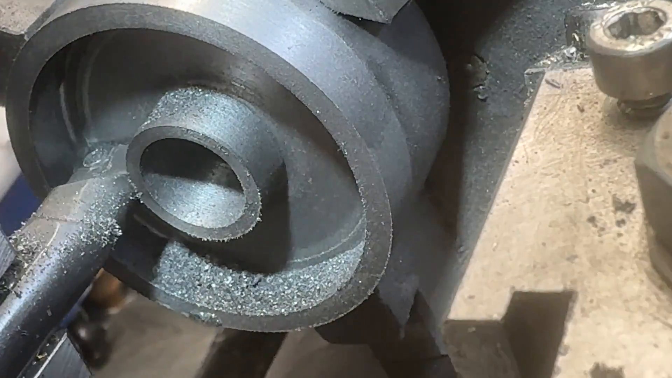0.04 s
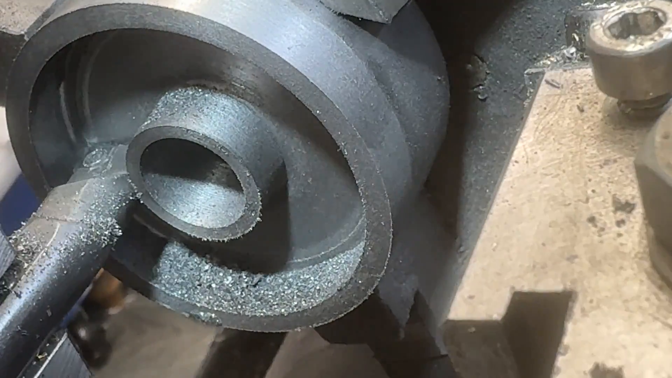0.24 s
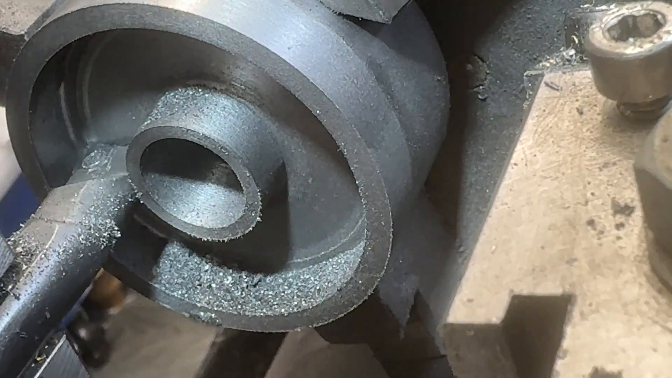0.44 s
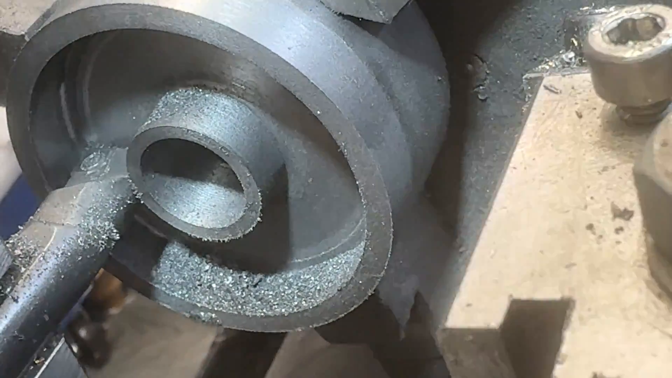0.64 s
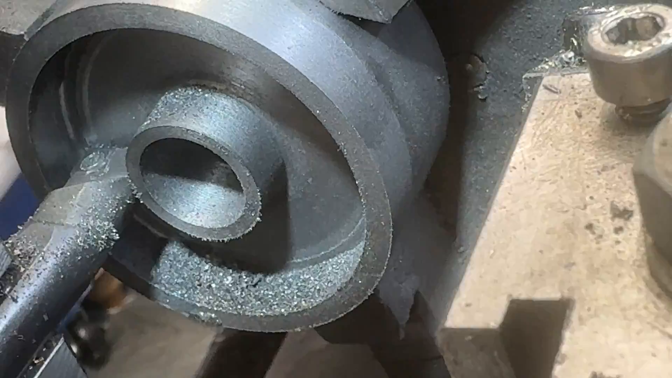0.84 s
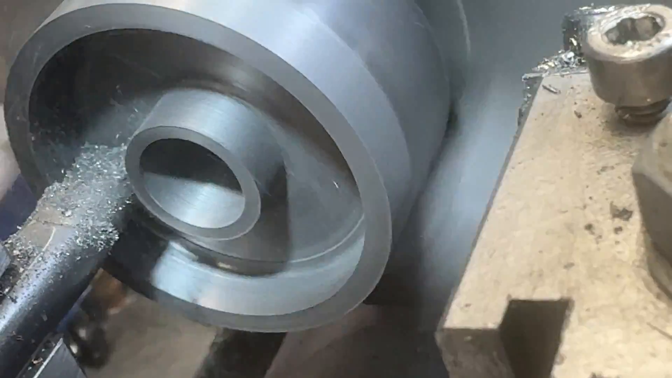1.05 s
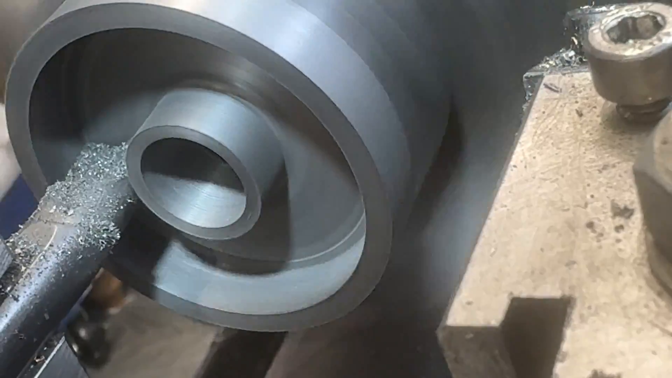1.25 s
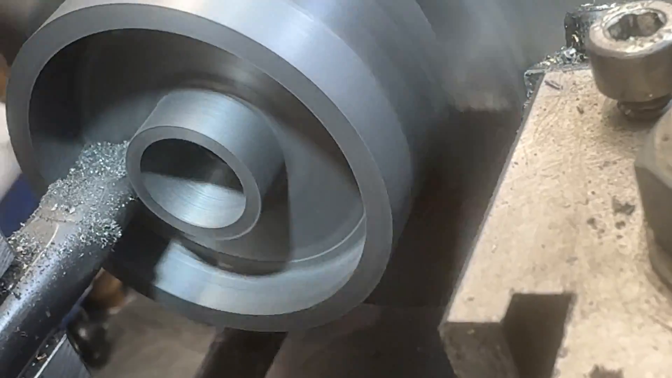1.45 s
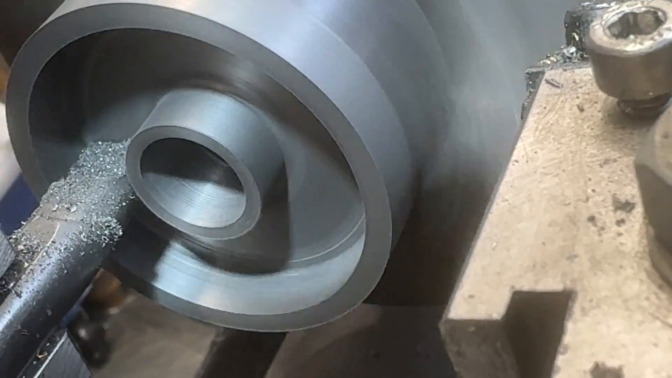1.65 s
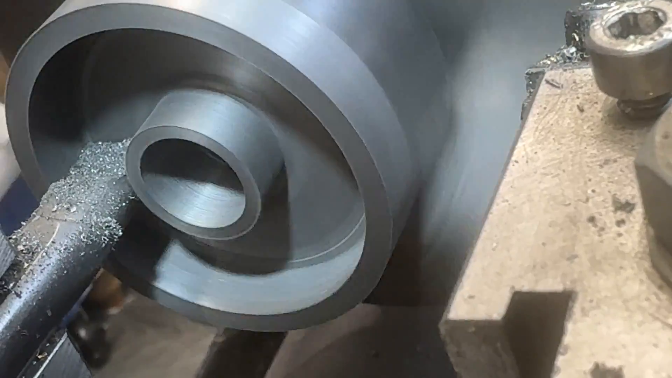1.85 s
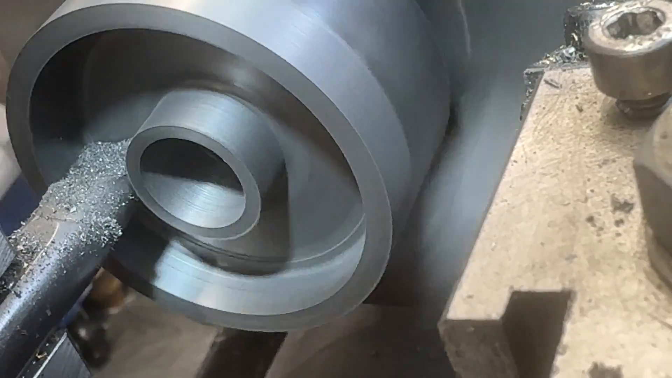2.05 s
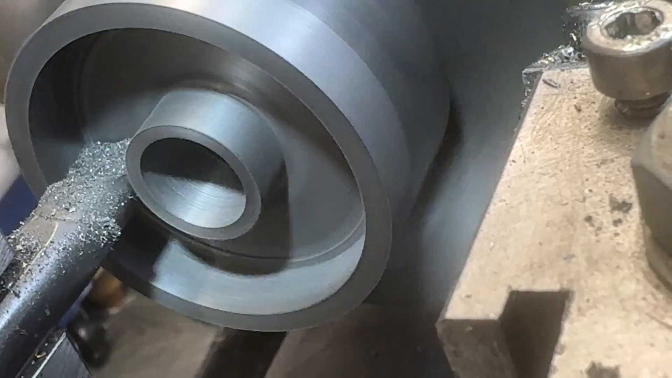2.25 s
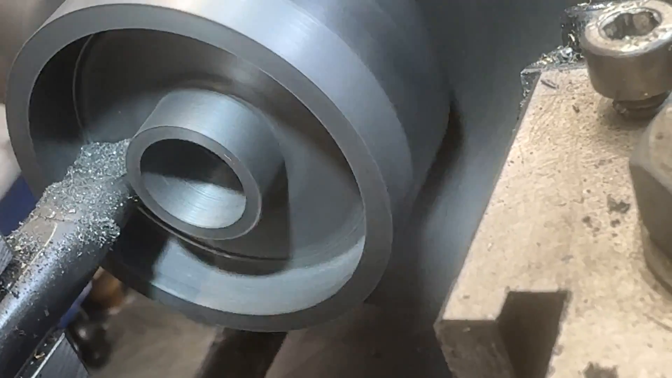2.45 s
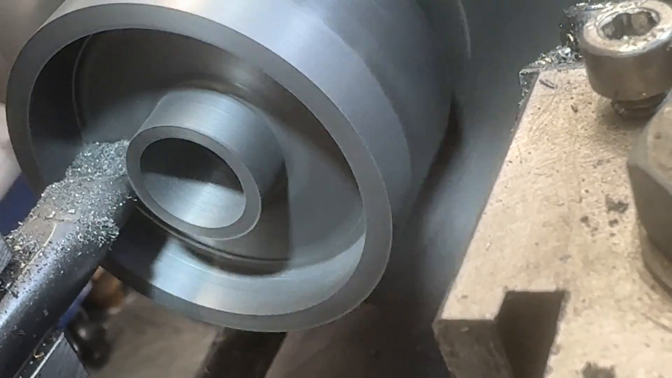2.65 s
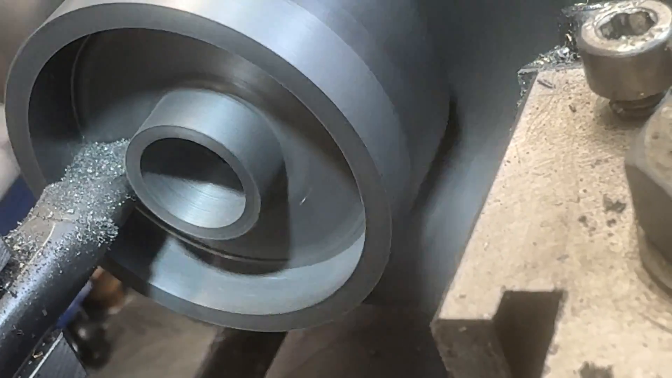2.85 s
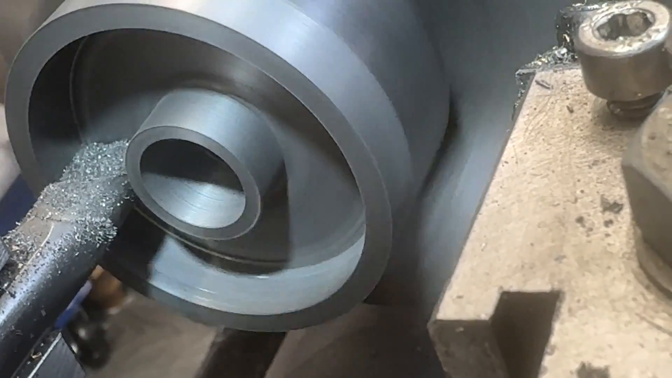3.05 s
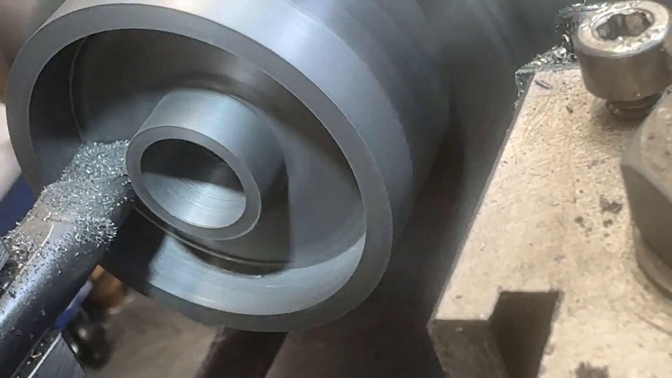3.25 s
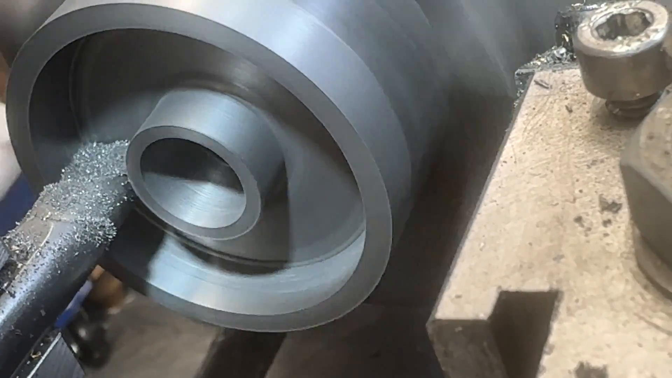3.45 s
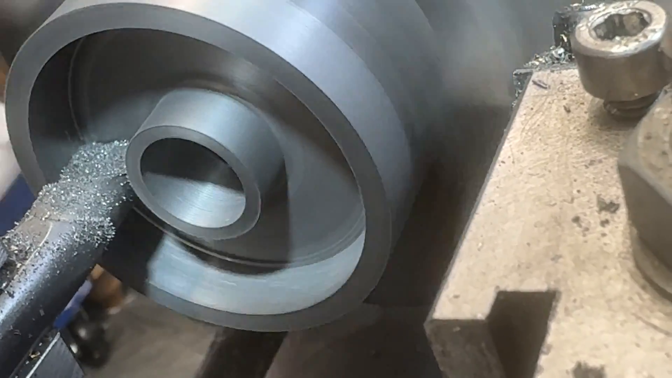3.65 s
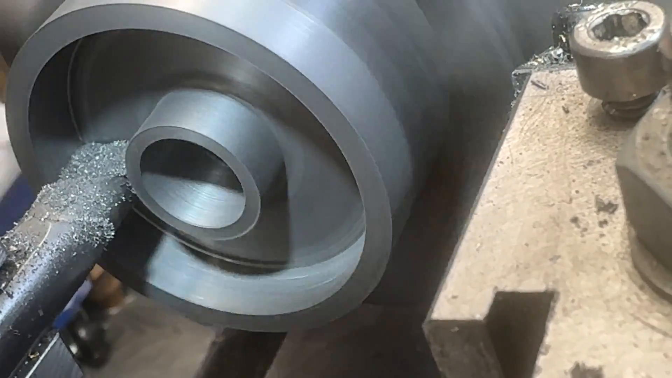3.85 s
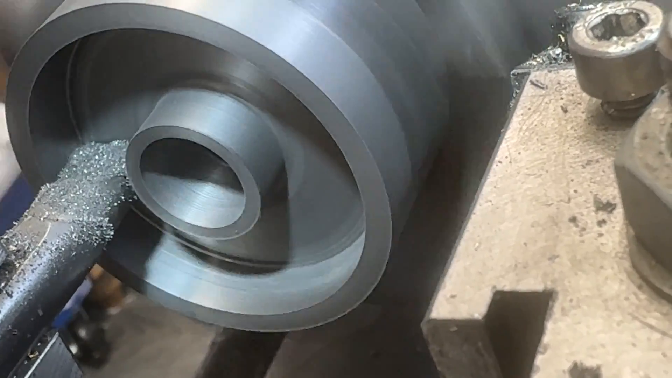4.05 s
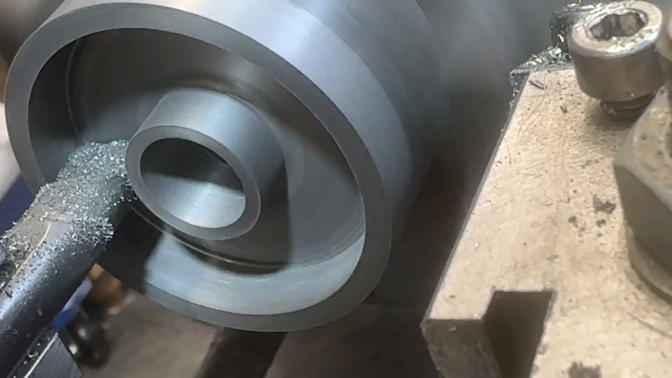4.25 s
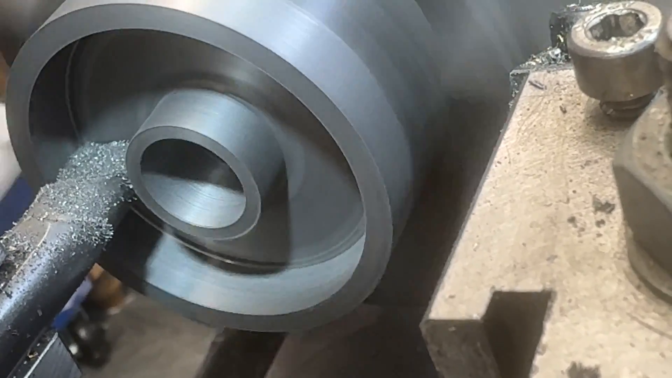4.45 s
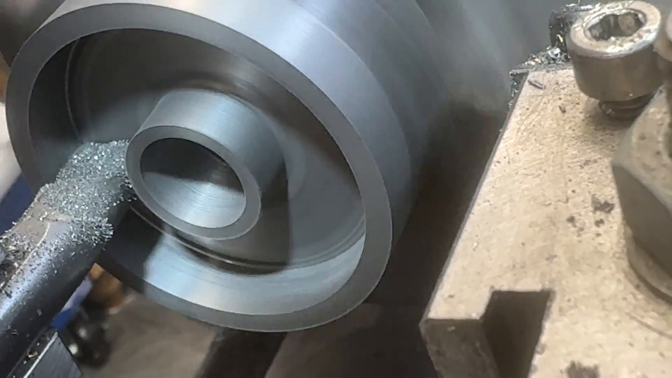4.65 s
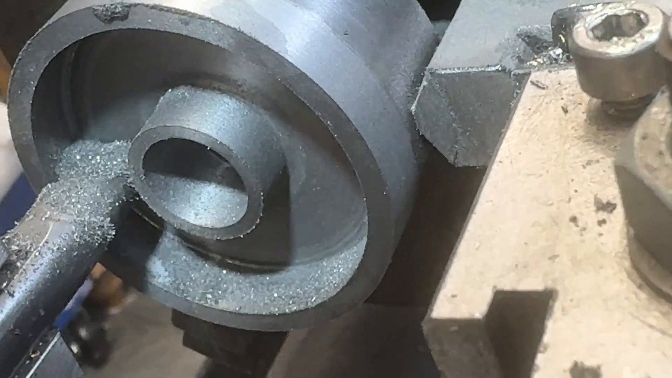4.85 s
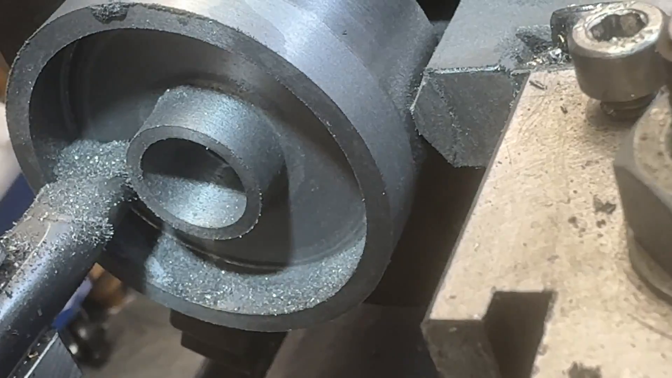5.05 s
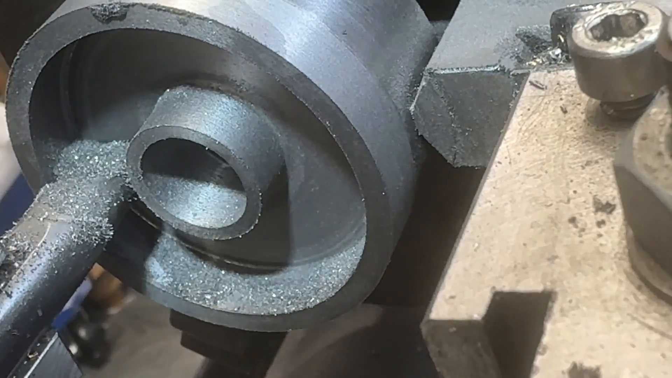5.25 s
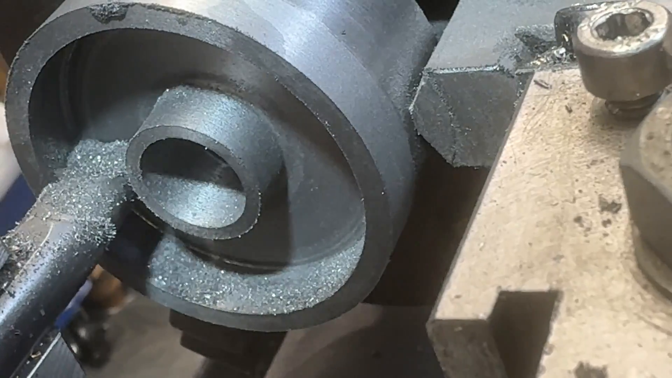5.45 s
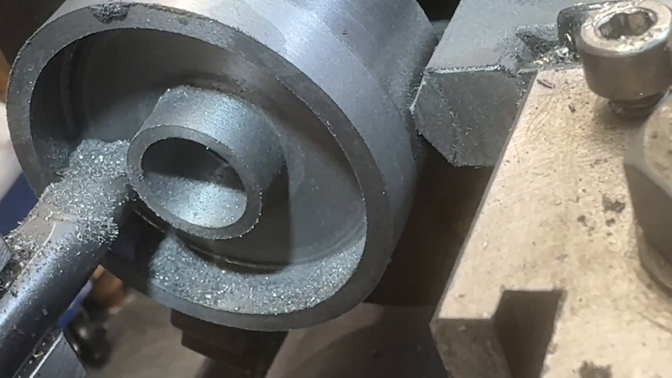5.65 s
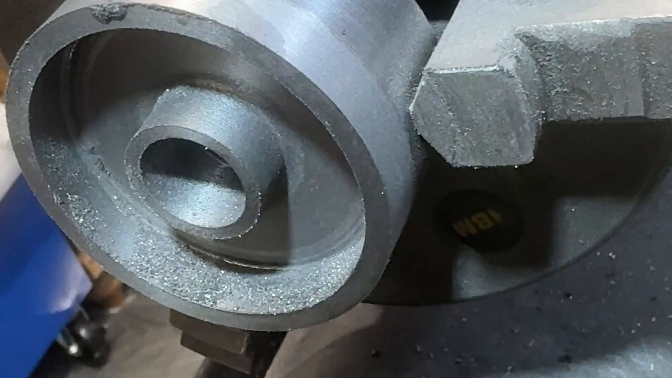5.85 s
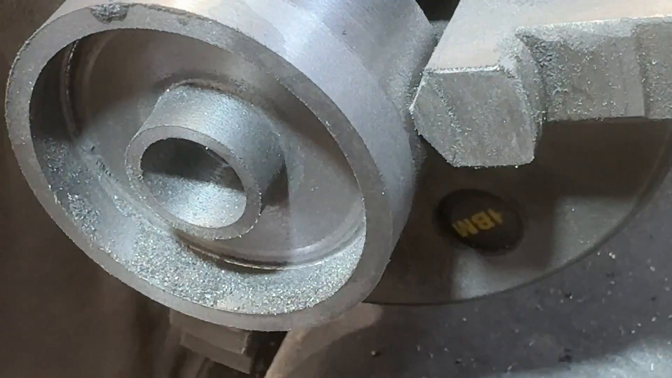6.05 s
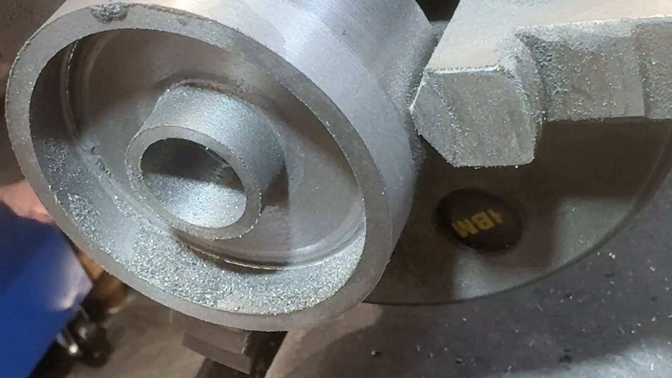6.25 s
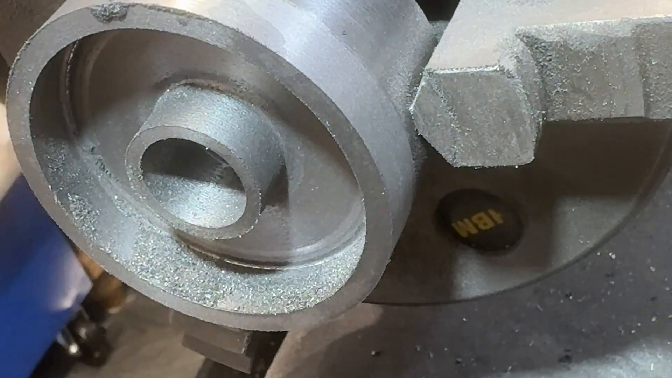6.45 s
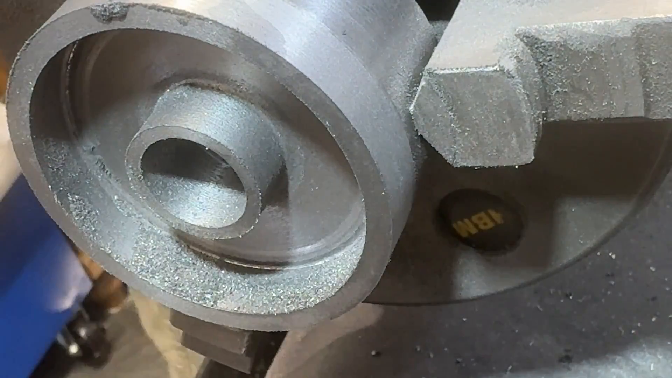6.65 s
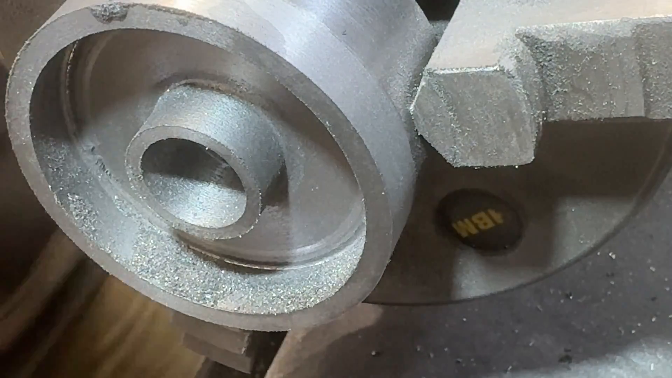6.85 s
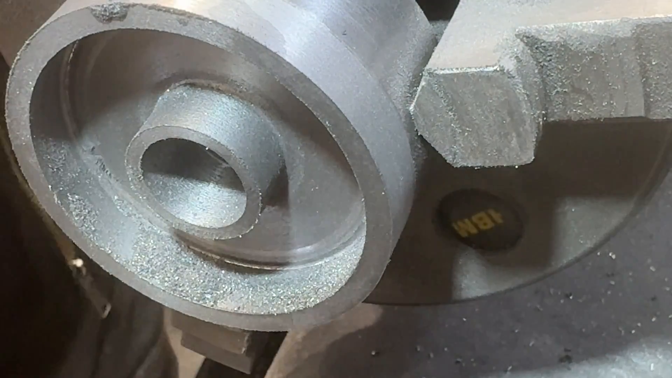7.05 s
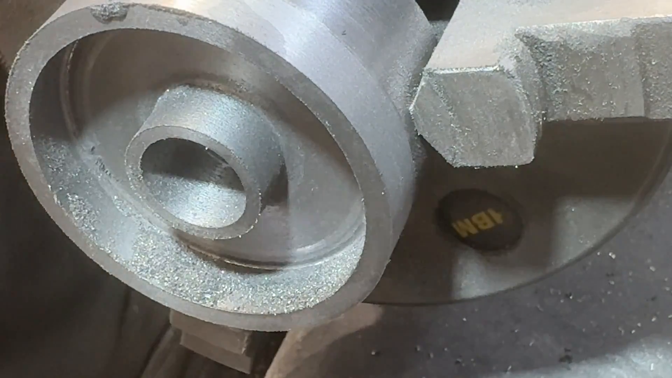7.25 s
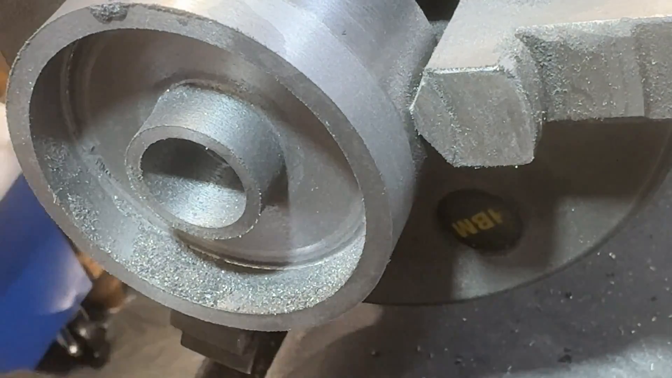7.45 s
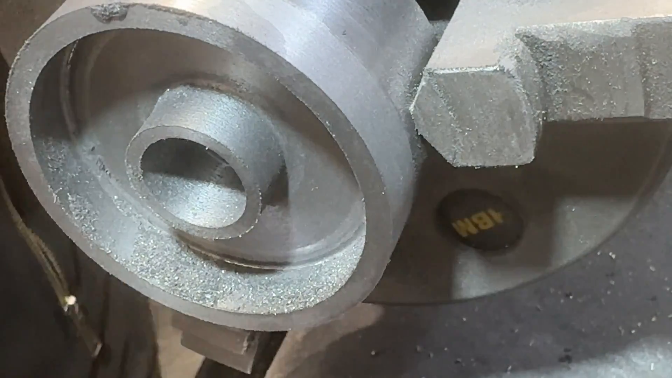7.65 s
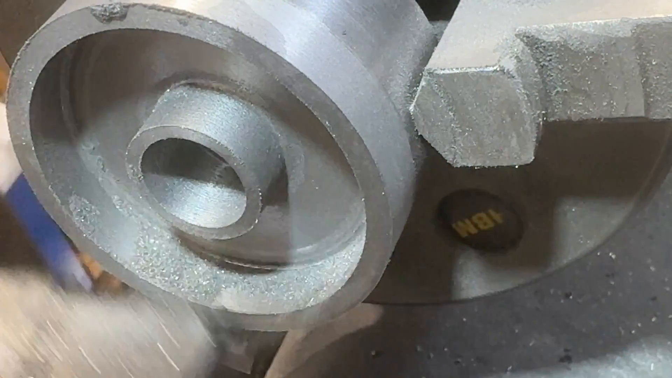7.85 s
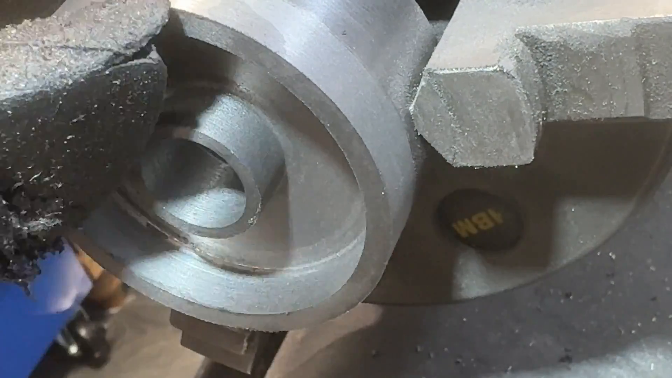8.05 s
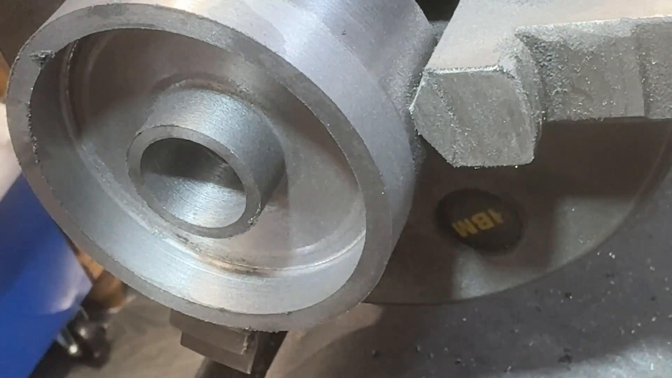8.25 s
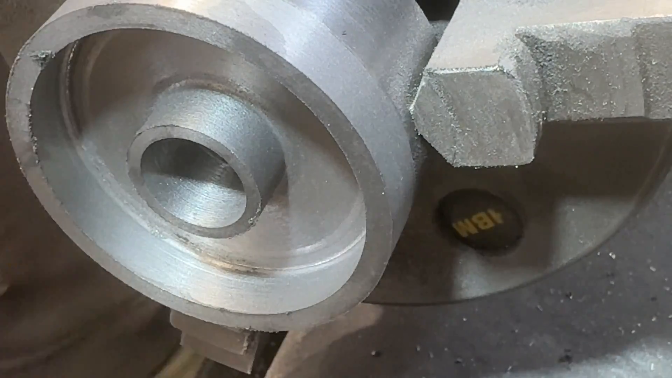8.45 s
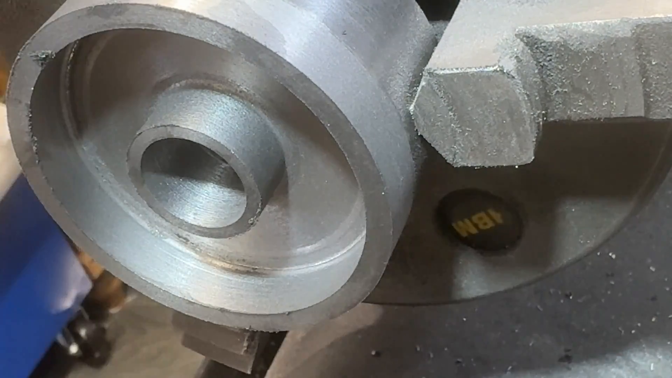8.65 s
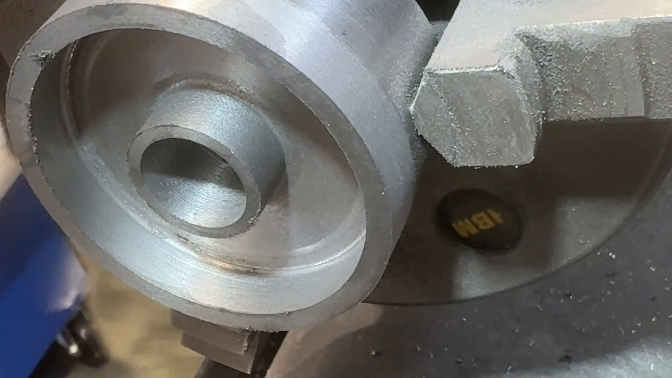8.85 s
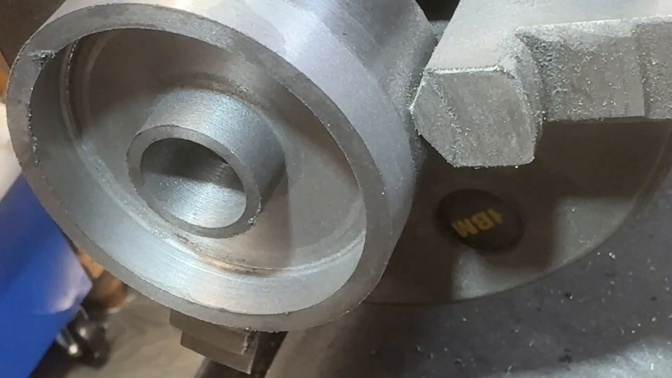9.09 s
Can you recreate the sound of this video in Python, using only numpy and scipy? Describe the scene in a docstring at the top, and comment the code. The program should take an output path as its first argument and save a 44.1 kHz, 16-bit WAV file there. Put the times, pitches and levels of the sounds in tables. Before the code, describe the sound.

Close to the microphone in a workshop, a metal lathe starts with light clicks and a rising whir. Brief scrapes lead into a steady, harsh cut that chatters and squeals. When the cut ends, the motor hums on under a short hollow rumble and some metallic knocks. Then a small vacuum cleaner starts with a high whine, sucks up metal chips with uneven rushing air and little taps, and winds down.

```python
"""A workshop, a small lathe close to a two-port microphone. After a few wipes and lever clicks the
drive motor runs up. The tool touches, then cuts a hollow metal part: the scrape repeats each turn and
rings the part and the boring bar. The spindle stops, the motor idles on, the carriage is wound back.
A hand vacuum cleaner whines up, sucks the chips out of the part and runs down."""
import sys
import numpy as np
from scipy import signal
from scipy.fft import rfft, irfft, next_fast_len
from scipy.io import wavfile
from scipy.ndimage import uniform_filter1d, map_coordinates

SR = 44100
rng = np.random.default_rng(int(sys.argv[2]) if len(sys.argv) > 2 else 0)


def digitize_waveform(pressure):
    """Quantize a signal to 16-bit integers and store it at the path in sys.argv[1].

    Rows of a 2-D input are taken as channels; values are limited to [-1, 1].
    """
    field = np.atleast_2d(pressure).T
    bounded = np.clip(field, -1, 1)
    quanta = np.round(bounded * 32767).astype(np.int16)
    wavfile.write(sys.argv[1], SR, quanta)


N = 402191
M = next_fast_len(N)
T, HZ = np.arange(N) / SR, np.fft.rfftfreq(M, 1 / SR)
CLUTCH_OUT_S = 4.86

# resonances of the part and of the boring bar: pitch_hz, width_hz, level_db
PART_MODES = [(2473, 105, -5.5), (4180, 190, -10), (5086, 193, 3.5), (5600, 260, -1), (6020, 60, -5.5),
              (7140, 120, -5), (7906, 220, 2), (8380, 27, 2), (9180, 140, -3.5), (9740, 500, 1.5),
              (11200, 140, -7)]
BAR_MODES = [(3464, 74, 0.5), (3608, 85, 2.5), (3790, 150, 8.5)]
# long cut: time_s, level_db, body_rel_db, bar_rel_db, chatter_rel_db
LONG_CUT = [(2.0, -45, -7, -1.5, -27), (2.012, -32.5, -24, -3, -3), (2.03, -32, -16, -2, -1),
            (2.25, -30, -15, 2, 1), (2.42, -32.5, -6.5, 1, -9), (2.57, -30.5, -7.5, 2.5, 5),
            (2.9, -31, -7.5, 0.5, -35), (3.05, -30, -8, 0.5, 0), (3.53, -34.5, -10.5, 2, -16),
            (3.68, -31.5, -8.5, -2, -5), (4.0, -30.5, -8.5, 1.5, 2.5), (4.1, -31.5, -5.5, 6.5, 5.5),
            (4.33, -34.5, -9.5, 6, 5.5), (4.48, -32.5, -5, 3, 2), (4.67, -34, -11, 2, -4),
            (4.79, -32.5, -5, -0.5, -14), (4.86, -50, 12, 7, -24), (4.92, -94, 3, -9, -10)]


def gain_of(db):
    """Decibels to gain."""
    return 10 ** (np.asarray(db) / 20)


def unit_rms(x):
    """Scale to rms 1."""
    return x / np.sqrt(np.mean(x ** 2) + 1e-20)


def steady(x):
    """Divide out the slow level."""
    return x / np.sqrt(uniform_filter1d(x ** 2, size=6000) + 1e-20)


def spectrum(points):
    """Interpolate over log frequency."""
    hz, value = np.transpose(points)
    return np.interp(np.log(HZ + 1), np.log(hz + 1), value)


def window(start_s, end_s, edge_s):
    """Gate with linear edges."""
    return np.clip(np.minimum(T - start_s, end_s - T) / edge_s, 0, 1)


def curves(rows):
    """Gate over the rows' span, then each column at sample rate."""
    time_s, *values = np.transpose(rows)
    return window(time_s[0], time_s[-1], 0.004), *(np.interp(T, time_s, v) for v in values)


def strokes(rows, edge_s):
    """Envelope of strokes: fade in, hold, fade out."""
    return sum(gain_of(db) * np.clip(np.minimum(T - s, s + length_s - T) / edge_s + .5, 0, 1) ** 2
               for s, length_s, db in rows)


def filtered(x, gain):
    """Apply a gain over frequency."""
    return irfft(rfft(x, M) * gain, M)[:N]


def noise(gain):
    """Coloured noise, rms 1."""
    return unit_rms(filtered(rng.standard_normal(M), gain))


def wander(rate_hz):
    """Smooth random drift, rms near 1."""
    coarse = rng.standard_normal(int(N / SR * rate_hz) + 4)
    return map_coordinates(coarse, [T * rate_hz], order=2)


def rings(modes, steep=1.57):
    """Gain over frequency of resonances: pitch_hz, width_hz, level_db."""
    return np.sqrt(sum(gain_of(db) ** 2 / (1 + (2 * (HZ - hz) / width_hz) ** 2) ** steep
                       for hz, width_hz, db in modes))


def tone(hz):
    """Sine on a pitch curve, rms 1."""
    return np.sqrt(2) * np.sin(2 * np.pi * (np.cumsum(hz) / SR + rng.random()))


def wipes(shop_db=-75):
    """Dry wiping strokes over the quiet shop, and a brief thin tone."""
    swipes = [(0, 0.042, -73), (.1, 0.081, -68), (.285, 0.064, -64), (.43, 0.065, -66), (.59, 0.079, -64),
              (.74, 0.11, -63.5)]  # start_s, length_s, level_db
    colour = [(100, -62), (220, -17.5), (497, -6), (917, -14.5), (1090, -12), (1840, -9), (2420, -25),
              (2870, -21.5), (15500, -33)]  # freq_hz, density_db
    level = np.hypot(strokes(swipes, edge_s=0.02), gain_of(shop_db))
    thin = gain_of(-77 + 2.3 * wander(31.7)) * tone(1106 + 2.6 * wander(18)) * window(.35, .62, .02)
    return level * noise(gain_of(spectrum(colour))) + thin


def knocks(strike_t60_s=0.000091, rattle_t60_s=0.071, tick_t60_s=0.03):
    """A sharp strike and a short rattle ring the lever; a treble tick on top."""
    hits = [(0.015, -53, -87, -5), (0.066, -50, -80, -2.5), (0.545, -68, -83, -2), (0.619, -47, -76, -1.5),
            (0.735, -52, -66, 9.5), (0.751, -48, -55, -5), (0.788, -55, -60, 1), (0.855, -49, -56, -5),
            (0.87, -47, -52, -4), (0.895, -42, -62, -9), (1.037, -36.5, -41, -6), (1.38, -36, -40, -4.5),
            (1.423, -40, -55, -6), (4.995, -43, -50, 0), (5.725, -37.5, -58, -2), (5.774, -50, -65, -4),
            (5.797, -44, -65, -2), (5.845, -41, -65, -10), (5.919, -41, -65, -2), (6.091, -43.5, -45, -3),
            (6.3, -48, -53, -5), (6.3947, -28.5, -40.5, -14), (6.478, -45, -51, -8)]  # start_s, level_db, tick_db, rattle_rel_db
    lever_modes = [(910, 260, 6), (1160, 72, 12), (1565, 170, 14), (2010, 120, 5), (2540, 170, 1),
                   (3070, 140, -11), (4400, 550, -30)]  # pitch_hz, width_hz, level_db
    t = np.arange(4000) / SR
    blows, ticks = np.zeros((2, N + len(t)))
    strike = 5.2 * gain_of(-60 * t / strike_t60_s)
    for start_s, db, tick_db, rattle_db in hits:
        rattle, tick = rng.standard_normal((2, len(t)))
        rattle *= gain_of(rattle_db - 60 * t / rattle_t60_s) * np.minimum(t / 0.001, 1)
        blows[round(start_s * SR):][:len(t)] += gain_of(db) * (strike + rattle)
        ticks[round(start_s * SR):][:len(t)] += gain_of(tick_db - 60 * t / tick_t60_s) * tick
    ring = sum(gain_of(db) * width_hz * np.exp(-np.pi * width_hz * t) * np.sin(2 * np.pi * hz * t)
               for hz, width_hz, db in lever_modes)
    ring = signal.sosfilt(signal.butter(4, 750, "high", fs=SR, output="sos"), ring)
    lever = signal.oaconvolve(blows, ring / np.linalg.norm(ring))[:N]
    tick_colour = rings([(4180, 900, 6), (6150, 2700, 8.7), (11000, 9500, 2.5)])
    return lever + filtered(ticks, tick_colour / (1 + (2500 / (HZ + 1)) ** 2))


def motor():
    """Shaft orders and switching whistles waver over a roar; a loose cover rings at idle."""
    levels = [(.77, -38, 0), (.8, -11.5, 3), (.9, 1, -3), (1.05, 0.5, -1), (2, 2.5, 2), (4.8, -1, 4),
              (4.9, -1.5, -6), (5.5, 0.5, -3), (6.6, 2.5, 5.5), (6.8, 0, -1), (8.7, -6.5, -7),
              (9.12, -2, -1)]  # time_s, gain_db, whistle_rel_db
    loaded_tones = [(635.2, -64), (800, -61), (838, -55), (950, -66), (1163, -66), (1470, -63), (2509, -62),
                    (3472, -64), (3628, -66), (5050, -68), (6492, -64), (7257, -61), (7413, -67),
                    (7569, -57), (7730, -59), (8656, -61), (10820, -72), (12134, -69), (12985, -72),
                    (14400, -69), (14718, -60), (14874, -66), (15192, -62), (15348, -65), (15665, -59)]  # driving the spindle: pitch_hz, level_db
    idle_tones = [(635.2, -63), (738, -67), (802, -60), (843, -55), (862, -62), (893.6, -63), (945, -65),
                  (1050, -64), (1163, -64), (1335, -65), (1615, -64), (1690, -67), (1900, -67), (2062, -70),
                  (3483, -65), (3801, -70), (3962, -72), (7122, -71), (7284, -60), (7440, -59), (7601, -64),
                  (7757, -58), (12134, -69), (14400, -68), (14718, -56), (14874, -64), (15030, -65),
                  (15192, -61), (15348, -65), (15665, -63)]  # pitch_hz, level_db
    roar_colour = [(60, -58), (220, -42), (270, -24.5), (390, -21), (440, -11.5), (600, -15), (720, -9.5),
                   (839, -6.5), (1110, -11), (1650, -5.5), (2290, -16), (3570, -17), (4200, -22.5),
                   (7530, -19.5), (8870, -25.5), (15900, -27.5)]  # freq_hz, density_db
    spindle_hiss = [(9000, -10), (13000, 3)]  # freq_hz, density_db
    idle_moan = [(4.9, 454, -71), (5.9, 457, -67), (6.3, 448, -61.5), (6.9, 421, -61)]  # time_s, pitch_hz, level_db
    idle_whine = [(4.87, -63), (5.2, -62.5), (5.47, -56), (5.56, -82), (5.62, -64.5), (6.09, -56.5),
                  (6.17, -64), (6.3, -58), (6.55, -54), (6.65, -77), (8.6, -61), (9.12, -69)]  # one switching whistle, swelling and dropping out: time_s, level_db
    _, gain_db, whistle_db = curves(levels)
    idle, running, switching = np.clip([(T - CLUTCH_OUT_S) / .014, (T - .98) / .07, (T - .78) / .15], 0, 1)
    sway = [gain_of(2.57 * wander(9)) for _ in range(5)]
    drift_hz = [2 * wander(12) for _ in range(3)]
    whistle = gain_of(whistle_db) * switching
    hum = 0
    for tones, gate in ((idle_tones, idle), (loaded_tones, 1 - idle)):
        for k, (hz, db) in enumerate(tones):
            level = gate * gain_of(db) * (whistle if hz > 12000 else running)
            hum += level * sway[k % 5] * tone(hz + drift_hz[k % 3])
    roar = gain_of(-50.5) * noise(gain_of(spectrum(roar_colour)))
    cover = idle * gain_of(-66.5 + 2.9 * wander(17)) * noise(rings([(2500, 63, 0)]))
    hiss = (1 - idle) * running * gain_of(-53.5) * noise(gain_of(spectrum(spindle_hiss)))
    gate, moan_hz, moan_db = curves(idle_moan)
    moan = gate * gain_of(moan_db + 4.4 * wander(45)) * tone(moan_hz + 3 * wander(39))
    gate, whine_db = curves(idle_whine)
    whine = gate * gain_of(whine_db + 2.4 * wander(18)) * tone(3642 + drift_hz[0])
    return gain_of(gain_db) * (T > levels[0][0]) * (hum + roar + cover + hiss) + moan + whine


def gear_run_up():
    """Gear and shaft tones climb through the frame's resonances, rattling more as they rise."""
    climbs = [(.775, .805, 450, 880, -52), (.815, .9, 400, 880, -49), (.89, 1.07, 290, 620, -46),
              (.9, 1.04, 810, 850, -54), (.825, 1.025, 1680, 7030, -52)]  # start_s, end_s, from_hz, to_hz, level_db
    frame = rings(PART_MODES + BAR_MODES + [(860, 210, 6.5), (5560, 14000, -5)])
    out = np.zeros(N)
    for start_s, end_s, from_hz, to_hz, db in climbs:
        progress = np.clip((T - start_s) / (end_s - start_s), 0, 1)
        hz = (from_hz + (to_hz - from_hz) * progress) * (1 + .015 * wander(300))
        rough = 0.55 * np.minimum(hz / 3000, 1)
        swell = (0.92 + 0.37 * progress) * window(start_s, end_s, (end_s - start_s) / 10)
        level = gain_of(db + 1.4 * wander(90.5)) * np.interp(hz, HZ, frame) * swell
        out += level * ((1 - rough) * tone(hz) + rough * wander(200) * tone(hz))
    return out


def tool_contact(rub_db=-48, rise_s=0.013, t60_s=0.39):
    """Level of the tool on the part: light rub, brief touches, long cut."""
    touches = [(1.021, 0.0064, -44.5), (1.367, 0.0089, -49), (1.595, 0.034, -32)]  # start_s, hold_s, peak_db
    touch = 0
    for start_s, hold_s, db in touches:
        decay_s = np.maximum(T - start_s - rise_s - hold_s, 0)
        touch += gain_of(db - 60 * decay_s / t60_s) * np.clip((T - start_s) / rise_s, 0, 1)
    gate, level_db = curves(LONG_CUT)[:2]
    rub = gain_of(rub_db) * (T > 1.036) * (T < CLUTCH_OUT_S)
    return np.sqrt(touch ** 2 + rub ** 2 + (gate * gain_of(level_db)) ** 2)


def scrape_spectrum(turns, depth, fine_memory=0.864, coarse_memory=0.91):
    """The tool meets the last turn's marks again: the scrape repeats each turn and changes slowly."""
    fresh_share = [(200, 0.87), (800, 0.73), (930, 0.06), (5000, 0.13), (8000, 0.37), (11000, 0.14)]  # torn anew each turn: freq_hz, share
    torn = rng.standard_normal((int(turns[-1]) + 2, 720))  # one row a turn
    fine, coarse = (rfft(unit_rms(signal.lfilter([1], [1, -memory], torn, axis=0).ravel()))
                    for memory in (fine_memory, coarse_memory))
    marks_per_turn = np.arange(len(fine)) / len(torn)
    marks = irfft(np.where(marks_per_turn < 40, coarse, fine), torn.size * 4)
    traced = unit_rms(np.interp(turns * 720 * 4, np.arange(len(marks)), marks))
    # a light touch leaves no marks
    scrape = np.sqrt(depth) * traced + np.sqrt(1 - depth) * rng.standard_normal(N)
    fresh = np.clip(spectrum(fresh_share), 0, 1)
    return np.sqrt(1 - fresh) * rfft(scrape, M) + np.sqrt(fresh) * rfft(rng.standard_normal(N), M)


def part_ring(scrape, depth):
    """The scrape rings the part; a thin mode of the rim squeals."""
    rim_mode = [(4404, 24, 1)]  # pitch_hz, width_hz, level_db
    floor = [(20, -14.5), (300, -26.5), (900, -54), (2900, -40), (4200, -20), (7500, -5.5), (8600, -19),
             (12500, -16), (15000, -24.5)]  # scrape between the modes: freq_hz, level_db
    rim = rings(rim_mode)
    modes = np.hypot(rings(PART_MODES), gain_of(5.5) * rim)
    ring = unit_rms(irfft(scrape * np.hypot(modes, gain_of(spectrum(floor))), M)[:N])
    ring -= (1 - depth) * filtered(ring, 1 / (1 + (HZ / 250) ** 4))  # only a deep cut thuds
    ring -= (T < LONG_CUT[0][0]) * 0.55 * filtered(ring, np.minimum(rim, 1))  # less squeal early on
    treble_mode = np.minimum(rings(PART_MODES[-2:-1]), 1)
    return ring - (1 - depth) * 0.87 * filtered(ring, treble_mode)


def chatter(turns, mean_spindle_hz, high_spot_s=4.257):
    """A high spot of the bore kicks the bar once a turn."""
    pitch = [(2.0, 3580), (3.1, 3590), (4.05, 3650), (4.3, 3630), (4.5, 3570), (4.8, 3700)]  # time_s, pitch_hz
    offset_turns = (turns - turns[round(high_spot_s * SR)] + .5) % 1 - .5
    cycles = curves(pitch)[1] / mean_spindle_hz * offset_turns
    return unit_rms(np.exp(-(offset_turns / 0.14) ** 2) * np.cos(2 * np.pi * cycles))


def cut():
    """One scrape drives the part, its hollow body and the boring bar."""
    spindle = [(2, 56.92), (2.25, 56.74), (2.55, 56.52), (3.2, 56.5), (3.45, 56.74), (3.7, 56.5),
               (3.95, 56.5), (4.2, 56.63), (4.86, 56.6)]  # sags under load: time_s, speed_hz
    body_modes = [(1494, 17, 9), (1535, 63, 4.5), (1633, 71, 4.5), (1775, 390, -7.5), (1103, 280, -17.5)]  # pitch_hz, width_hz, level_db
    top_mode_level = [(2.2, -8), (2.5, 4), (2.95, 2), (3.1, 5), (3.5, -1), (3.7, 0), (4.2, 2), (4.5, -6),
                      (4.75, 8)]  # bar's top mode against the others: time_s, rel_db
    body_db, bar_db, chatter_db = curves(LONG_CUT)[2:]
    level, spindle_hz = tool_contact(), curves(spindle)[1]
    turns = np.cumsum(spindle_hz) / SR
    depth = np.clip((20 * np.log10(level + 1e-9) + 50) / 14, 0, 1)
    scrape = scrape_spectrum(turns, depth)
    body, bar_low, bar_top = (steady(irfft(scrape * rings(modes, steep=1.48), M)[:N])
                              for modes in (body_modes, BAR_MODES[:2], BAR_MODES[2:]))
    top_gain, kick = gain_of(curves(top_mode_level)[1] - 3), gain_of(chatter_db)
    bar = (bar_low + top_gain * bar_top) / np.hypot(1, top_gain)
    bar = (bar + kick * chatter(turns, spindle_hz.mean())) / np.hypot(1, kick)
    pressure = gain_of(-9.5 * (1 - depth))  # body and bar ring less under a light rub
    body_and_bar = pressure * (gain_of(body_db) * body + gain_of(bar_db) * bar)
    return level * (part_ring(scrape, depth) + body_and_bar)


def swishes(mid_share=0.63):
    """Brief wide rushes before the long cut, in opposite phase at the two ports."""
    rushes = [(1.105, 0.045, -46), (1.35, 0.1, -47), (1.64, .095, -47.5), (1.905, 0.085, -49.5)]  # start_s, length_s, level_db
    colour = rings([(795, 1000, 0)]) / (1 + (380 / (HZ + 1)) ** 3)
    rush = strokes(rushes, edge_s=0.018) * noise(colour)
    return np.outer([mid_share + 1, mid_share - 1], rush)


def carriage(edge_s=0.054):
    """The carriage rumbles hollowly as it is wound back; loose chips rustle."""
    winds = [(5.55, 0.23, -55.5), (5.75, 0.26, -45.5), (6.05, 0.16, -55)]  # start_s, length_s, level_db
    rustles = [(6.12, 0.13, -58), (6.25, 0.098, -54), (6.41, 0.09, -56)]  # start_s, length_s, level_db
    hollow = rings([(814, 41, 6.5), (1110, 220, -2.5), (1490, 110, -6)])
    rumble = noise(hollow * HZ / (HZ + 2000)) * gain_of(2 * wander(40))
    rustle = noise(rings([(9460, 15000, 0)]) * HZ / (HZ + 4000)) * gain_of(4.7 * wander(60))
    return strokes(winds, edge_s) * rumble + strokes(rustles, edge_s) * rustle


def nozzle_air():
    """Patchy air at the vacuum nozzle: rush, sharp jet, hiss and hollow gulp."""
    levels = [(6.69, -59, 6, -47), (6.78, -42.5, -1.5, -34), (6.88, -28, -1, -31.5), (6.99, -35, 12, -29),
              (7.01, -39, 5, -21.5), (7.08, -33.5, 4, -29.5), (7.11, -42, 10.5, -36), (7.18, -38, 12, -36),
              (7.25, -26, -5.5, -41.5), (7.37, -36.5, 4, -40), (7.52, -37.5, 1, -37), (7.56, -34, 3.5, -37),
              (7.76, -30, -0.5, -39.5), (7.81, -33, 1.5, -33), (7.94, -30.5, -3, -41), (8.02, -29, -1, -37),
              (8.19, -32.5, 0, -39.5), (8.23, -40, -0.5, -41.5), (8.33, -36, -1.5, -41.5),
              (8.4, -49.5, 1, -45), (8.77, -46.5, 1.5, -39.5), (8.79, -49, 1, -38), (8.93, -59.5, 0, -50),
              (9.11, -67, 1, -61)]  # time_s, rush_db, jet_rel_db, hiss_db
    rush_modes = [(4200, 450, -0.5), (4800, 1200, 2), (3070, 720, -34)]  # pitch_hz, width_hz, level_db
    jet_modes = [(6770, 3050, 6), (8600, 840, -2)]  # pitch_hz, width_hz, level_db
    hiss_colour = [(5590, -17.5), (9500, -3), (10400, -1), (14300, 6.5), (15900, -2)]  # freq_hz, density_db
    gulp_colour = [(20, -33), (327, -27.5), (811, -16.5), (886, -12.5), (2300, -8.5), (2630, -11),
                   (2870, -10.5), (4000, -17.5), (5200, -54)]  # freq_hz, density_db
    gate, rush_db, jet_db, hiss_db = curves(levels)
    low_cut = HZ / (HZ + 3000)
    air = gain_of(rush_db) * noise(rings(rush_modes) * low_cut)
    air += gain_of(rush_db + jet_db) * noise(rings(jet_modes) * low_cut)
    air += gain_of(hiss_db) * noise(gain_of(spectrum(hiss_colour)))
    air += gain_of((rush_db + hiss_db) / 2 - 4.5) * noise(gain_of(spectrum(gulp_colour)))
    cells = signal.stft(air, nperseg=512)[2]
    for bins, frames, spread_db in ((9, 7, 1.76), (60, 4, 1.1)):  # narrow patches, wide gusts
        flicker = uniform_filter1d(rng.standard_normal(cells.shape), bins, axis=0)
        cells *= gain_of(spread_db * unit_rms(uniform_filter1d(flicker, frames, axis=1)))
    return gate * signal.istft(cells, nperseg=512)[1][:N]


def vacuum_fan(on_s=6.7025, rise_s=.04, off_s=8.762, coast_s=.186, blades=6, echo_t60_s=.2):
    """Whine through the hose, and a blade tone; quick run-up, then coasting against air drag."""
    full_speed = [(6.7, 2653, -23), (7.0, 2658, -25), (7.11, 2698, -39), (7.22, 2670, -34),
                  (8.0, 2672, -30.5), (8.16, 2692, -31.5), (8.31, 2667, -30), (8.42, 2674, -36),
                  (8.62, 2660, -38), (8.75, 2698, -29.5)]  # races when the nozzle is blocked: time_s, pitch_hz, level_db
    hose_modes = [(1650, 140, 5), (2010, 160, 1), (2385, 152, 3.5), (2672, 94, -1)]  # pitch_hz, width_hz, level_db
    _, top_hz, whine_db = curves(full_speed)
    run_up = 1 - np.exp(-np.maximum(T - on_s, 0) / rise_s)
    speed = run_up / (1 + np.maximum(T - off_s, 0) / coast_s)
    hz = top_hz * speed
    level = np.interp(hz, HZ, rings(hose_modes)) * speed ** 1.67 * gain_of(whine_db + wander(40))
    whine = level * tone(hz + 2.6 * wander(60))
    blade_tone = gain_of(-33.5 + 2 * wander(100)) * tone(blades * hz) * (hz / hz.max()) ** 4.6
    tail = rng.standard_normal(SR // 2) * gain_of(-60 * T[:SR // 2] / echo_t60_s)
    shop_echo = gain_of(-21) * signal.oaconvolve(whine, tail / np.linalg.norm(tail))[:N]
    return whine + shop_echo + blade_tone


def hose_hum(pitch_hz=801.3):
    """A steady note in the hose."""
    levels = [(6.71, -40.5), (6.97, -45), (7.0, -56.5), (8.75, -53), (8.8, -63)]  # time_s, level_db
    gate, db = curves(levels)
    return gate * gain_of(db + wander(21)) * tone(pitch_hz + .5 * wander(8.9))


def chips(tap_hz=2000, tube_hz=490, drop_s=.0015, t60_s=.036):
    """Chips thud up the tube, each falling from a bright tap to the tube note."""
    thuds = [(6.974, -30.5), (7.006, -31.5), (7.239, -42), (7.609, -43), (7.671, -38), (7.702, -39),
             (7.717, -30.5), (7.741, -34), (7.767, -31), (7.802, -38), (7.827, -36), (7.936, -42),
             (8.0, -42), (8.072, -43)]  # start_s, level_db
    t = np.arange(1500) / SR
    glide_hz = tube_hz + (tap_hz - tube_hz) * np.exp(-t / drop_s)
    out = np.zeros(N)
    for start_s, db in thuds:
        envelope = gain_of(db - 60 * t / t60_s) * np.minimum(t / 0.00054, 1)
        out[round(start_s * SR):][:len(t)] += envelope * tone(glide_hz * rng.uniform(0.857, 1.15))
    return out


def ports(mid, side, lean, scatter, t60_s=0.2):
    """The two ports differ by a level lean, a phase lead and reflections off the metal."""
    reflections = [(300, .5), (1200, .5), (2500, .95)]  # in the side signal: freq_hz, weight
    bounce = rfft(rng.standard_normal(SR) * gain_of(-60 * T[:SR] / t60_s), M)
    tilt = np.tanh(spectrum(lean) * np.log(10) / 40) * HZ / (HZ + 200)
    rest = np.sqrt(np.maximum(gain_of(spectrum(side)) ** 2 - tilt ** 2, 0))
    reflected = np.clip(scatter * spectrum(reflections), 0, 1)
    phase = np.sqrt(reflected) * bounce / abs(bounce) - 1j * np.sqrt(1 - reflected)
    apart = filtered(mid, tilt + rest * phase)
    return np.array([mid + apart, mid - apart])


def scene():
    """Motor and hand noises, the cut and the vacuum cleaner reach the ports from their own places."""
    # stereo width: freq_hz, side_minus_mid_db
    shop_side = [(200, -5), (380, -28), (700, -8.5), (1290, -19.5), (2380, -4), (4400, -2), (8120, 4),
                 (10000, -7), (12000, -12), (15000, -44)]
    cut_side = [(450, -48), (800, -10), (1200, -39), (1600, -55), (1950, -13), (2250, -28), (2550, -4.5),
                (3000, 0), (3600, -14), (4300, -1.5), (5100, -6), (6000, -6), (9000, 0.5), (11000, -17),
                (15000, -60)]
    vacuum_side = [(60, -33), (200, -34), (380, -22), (700, -19), (1290, -72), (2380, -4), (4400, -16.5),
                   (8120, -6.5), (11500, -15.5), (15000, -50)]
    # balance: freq_hz, left_minus_right_db
    shop_lean = [(380, -0.5), (950, -4.5), (2380, 1), (5980, -20), (9000, -4), (11500, -1.5)]
    cut_lean = [(380, -1.5), (950, -6.5), (2380, 0), (5980, -2), (9000, -11.5), (11500, -1.5)]
    vacuum_lean = [(380, 0), (950, -1.8), (2380, -1), (5980, 1), (9000, -5.5), (11500, -0.2)]
    shop = wipes() + knocks() + motor() + gear_run_up() + carriage()
    mix = swishes() + ports(shop, shop_side, shop_lean, scatter=0.84)
    mix += ports(cut(), cut_side, cut_lean, scatter=0.97)
    vacuum = nozzle_air() + vacuum_fan() + hose_hum() + chips()
    return mix + ports(vacuum, vacuum_side, vacuum_lean, scatter=0.73)


def record(dry):
    """Steep low-pass at 15720 Hz."""
    low_pass = signal.firwin(1023, 15720, window=("kaiser", 9), fs=SR)
    return signal.oaconvolve(dry, low_pass[None], "same")


dry = scene()
out = record(dry)
digitize_waveform(out)
```